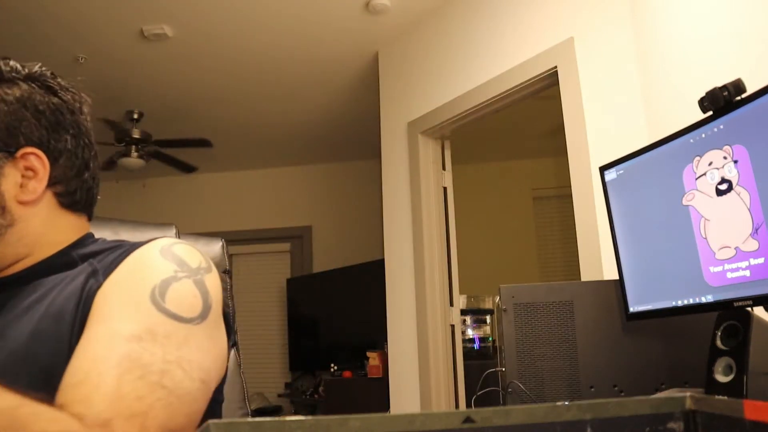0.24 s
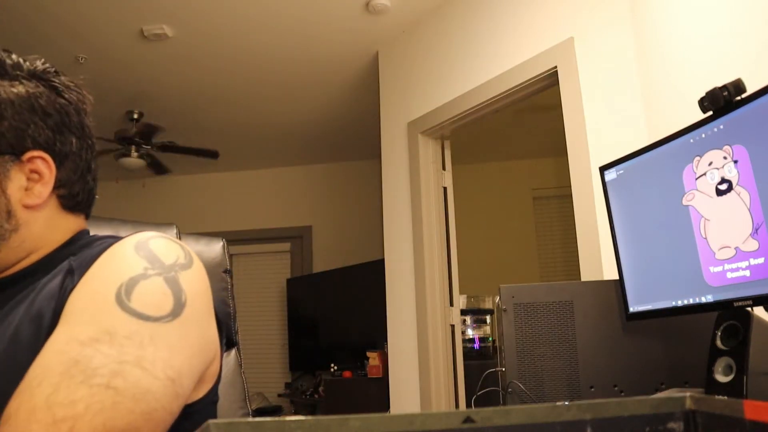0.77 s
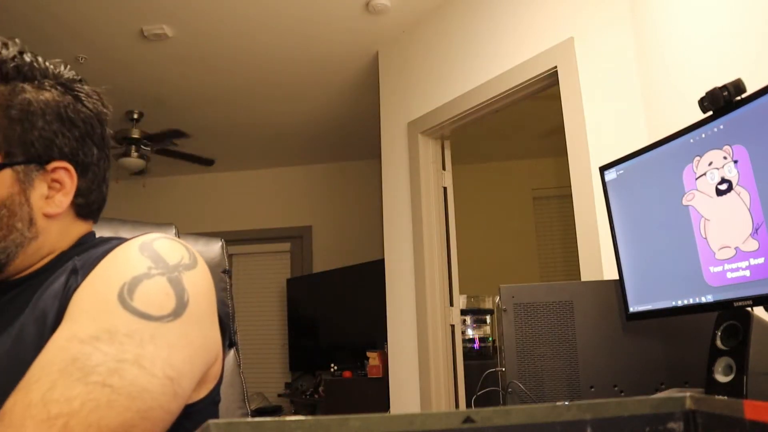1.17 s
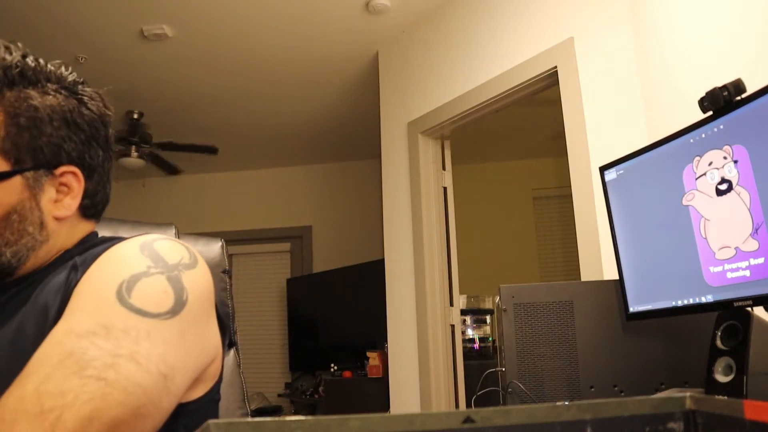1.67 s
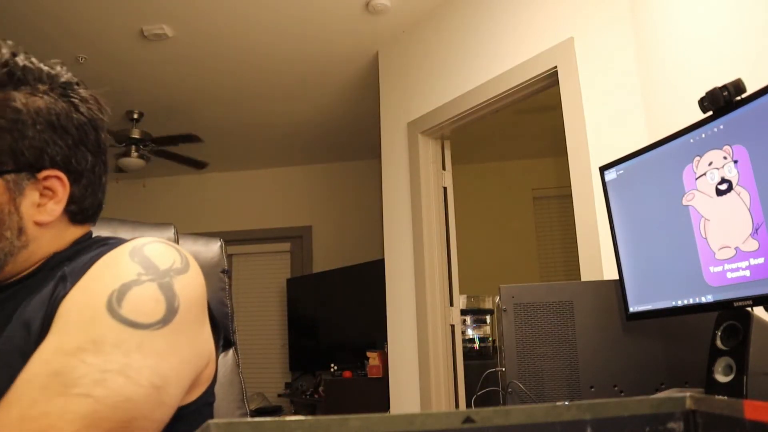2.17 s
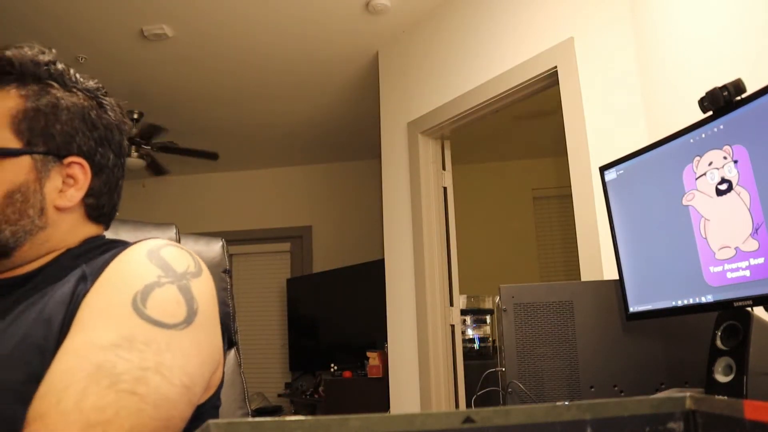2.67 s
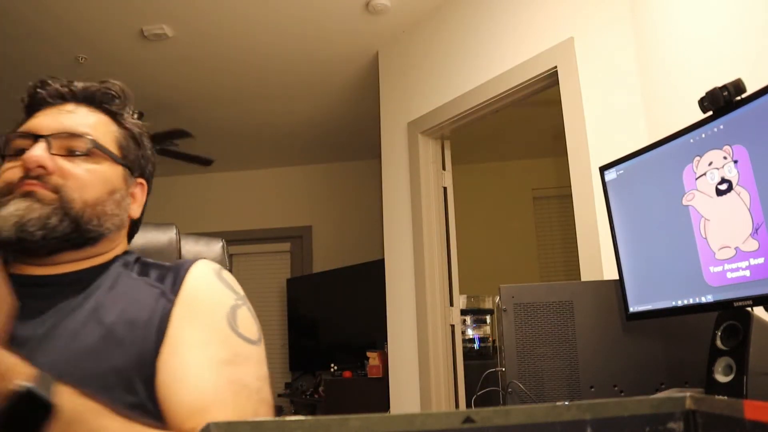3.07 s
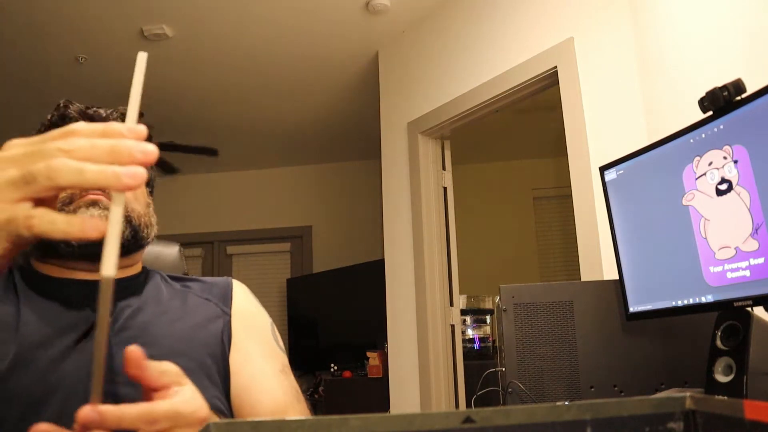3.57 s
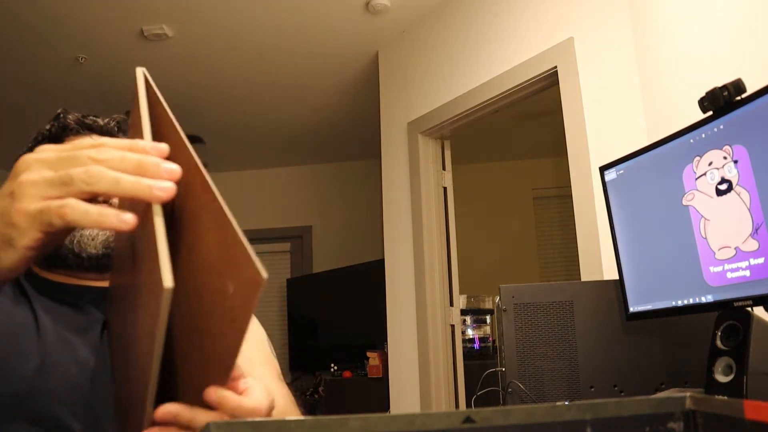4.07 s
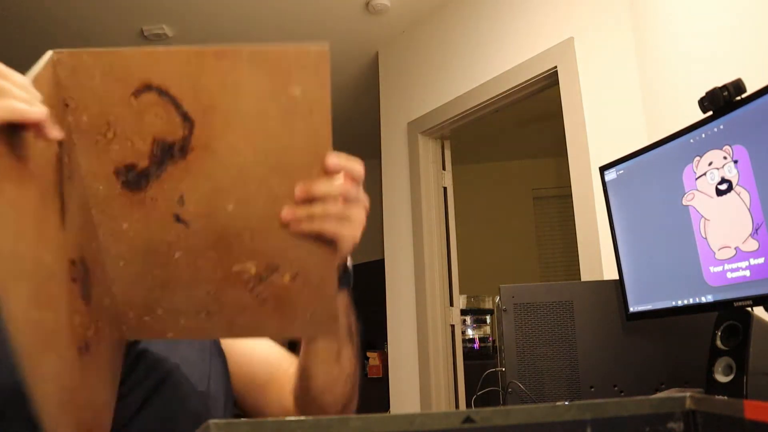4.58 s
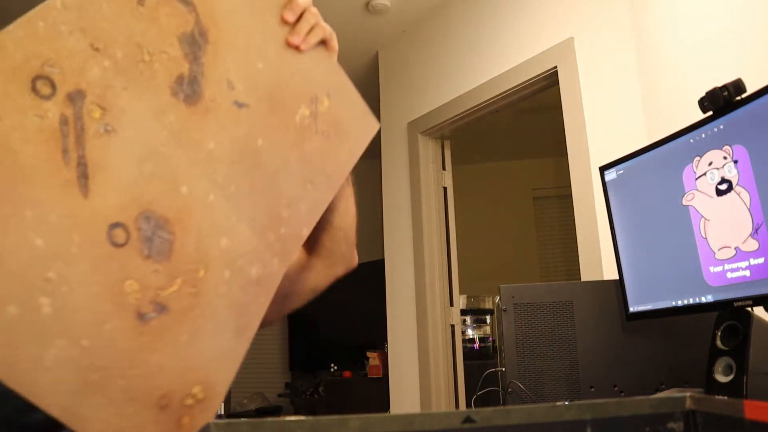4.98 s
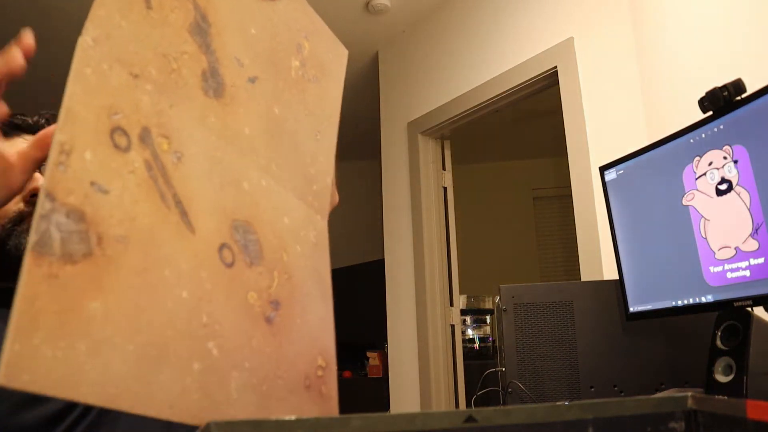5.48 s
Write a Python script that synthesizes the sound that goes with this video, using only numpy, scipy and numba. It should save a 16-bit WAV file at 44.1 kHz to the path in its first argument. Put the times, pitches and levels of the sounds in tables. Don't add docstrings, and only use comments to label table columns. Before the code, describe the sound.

Close to a bright microphone on a table in a small room, stiff card is dragged out with loud bright cracks and gritty hiss. Rustles and ticks follow, then another sharp snap and scrape near two seconds. Soft hand rubbing and unfolding come next, before a burst of heavy hollow knocks at the end. Low fan hum runs throughout.

```python
import sys
import numpy as np
from scipy import signal
from scipy.fft import rfft, irfft
from scipy.io import wavfile
from scipy.ndimage import uniform_filter1d
from numba import njit

SR = 44100
rng = np.random.default_rng(int(sys.argv[2]) if len(sys.argv) > 2 else 0)


def decibels_to_gain(level_db):
    exponent = np.asarray(level_db, float) / 20
    return 10 ** exponent


def waveform_to_disk(signal):
    frames = np.transpose(np.atleast_2d(signal))
    scaled = np.clip(frames, -1, 1) * 32767
    samples = np.round(scaled).astype(np.int16)
    wavfile.write(sys.argv[1], SR, samples)


N = 253134


def level(x, db):
    return x * decibels_to_gain(db) / np.sqrt(np.mean(x ** 2))


def colour(x, points):
    hz, db = np.transpose(points)
    f = np.maximum(np.arange(len(x) // 2 + 1) * SR / len(x), 1)
    gain = decibels_to_gain(np.interp(np.log(f), np.log(hz), db))
    return irfft(rfft(x) * gain, len(x))


@njit
def svf(x, hz, sharp):
    y = np.empty(len(x))
    band, low, damping = 0., 0., 1 / sharp
    for i in range(len(x)):
        g = np.tan(np.pi * hz[i] / SR)
        v = (band + g * (x[i] - low)) / (1 + g * (g + damping))
        band, low = 2 * v - band, low + 2 * g * v
        y[i] = damping * v
    return y


def walk(rate_hz):
    hold = int(SR / rate_hz)
    steps = np.repeat(rng.standard_normal(N // hold + 1), hold)
    smooth = uniform_filter1d(uniform_filter1d(steps, hold), hold)
    return 0.87 * smooth[:N]


def add(out, s, x):
    i = int(s * SR)
    out[i:i + len(x)] += x[:len(out) - i]


# [f/Hz, level/dB per Hz]
AIR_SPECTRUM = [(12, -37), (20, -9), (91, -9.5), (117, -23.5), (155, -6), (217, -4.5), (424, -15.5),
                (1070, -31.5), (1420, -29), (1720, -35.5), (2220, -35), (5000, -28.5), (5590, -29),
                (14500, -31), (16200, -37)]
# [f/Hz, width/Hz, level/dB]
HUM_MODES = [(122.3, 11.6, -44.5), (117, 7.4, -66), (219.4, 7.3, -48.5), (290.3, 9.2, -56.5),
             (1985, 95, -67), (4820, 160, -69)]
# [f/Hz, level/dB]
STEADY_TONES = [
    (27.5, -53.5),
    (14804, -76),
]


def air():
    t = np.arange(N) / SR
    breath = level(colour(rng.standard_normal(N), AIR_SPECTRUM), -44)
    out = breath * decibels_to_gain(0.3 * walk(11.0))
    for hz, width_hz, db in HUM_MODES:
        mode = svf(rng.standard_normal(N), np.full(N, 1. * hz), hz / width_hz)
        out = out + level(mode, db)
    for hz, db in STEADY_TONES:
        out = out + level(np.sin(2 * np.pi * hz * t + 1.1 * walk(3.15)), db)
    return out


def room(x):
    t60_s, tail_db, onset_s = 0.27, -7, 0.00043
    t = np.arange(20000) / SR
    tail = rng.standard_normal(len(t)) * 1000. ** (-t / t60_s) * np.clip(t / onset_s, 0, 1)
    tail = signal.lfilter([1], [1, -.2], tail)
    return signal.fftconvolve(x, tail * decibels_to_gain(tail_db) / np.sqrt(np.sum(tail ** 2)))[:N]


def whoop():
    start_s, length_s, from_hz, to_hz = 0.124, .05, 350, 620
    peak_db, overtone_db = -22, -6
    u = np.arange(int(length_s * SR)) / (length_s * SR)
    hz = from_hz + (to_hz - from_hz) * np.sin(np.pi * u / 2) ** 2
    phase = 2 * np.pi * np.cumsum(hz) / SR
    tone = np.sin(phase) + decibels_to_gain(overtone_db) * np.sin(1.4 * phase)
    out = np.zeros(N)
    add(out, start_s, decibels_to_gain(peak_db) * np.sin(np.pi * u) * tone)
    return out


# [f/Hz, level/dB, t60/s]
BOARD_MODES = [(46.5, -14, .2), (92, -1, 1), (109, -1.5, .14), (142, 5.5, 0.068), (193, 11.5, 0.039),
               (207.6, 11.5, 0.069), (320, 11.5, 0.075), (348, -9, 0.26), (432, 7.5, 0.053),
               (528, 5.5, 0.047), (710, -24.5, 0.02), (735, 0.5, 0.071), (937, 15, 0.055), (1125, 8, .03),
               (1435, 18, .04), (1920, 16, .03)]
# [t/s, peak level/dB, contact/ms, pitch factor, best-struck f/Hz]
KNOCK_EVENTS = [(0.079, -7, 0.64, 1.2, 1000), (0.125, -19, 0.35, 1.46, 301),
                (0.137, -16.5, 0.39, 1.46, 414), (0.149, -22, 0.89, 1.15, 537),
                (0.161, -36, 0.27, 1.37, 528), (1.974, -9.5, 0.35, 0.893, 790),
                (2.002, -15, 0.76, 1.025, 240), (5.034, -24.5, 0.83, 1.03, 336),
                (5.068, -22.5, 0.92, 0.986, 345), (5.163, -22.5, 0.98, 1.08, 353),
                (5.354, -27, 0.61, 1.13, 382), (5.375, -21.5, 0.95, 1.11, 336),
                (5.568, -2, 0.68, 1.06, 268), (5.578, 5, 0.76, 0.98, 263), (5.608, 4.5, 0.66, 0.94, 267),
                (5.62, 2, 0.46, 1.01, 345), (5.636, 0.5, 0.95, 1.02, 274), (5.66, -1.5, 0.83, 0.9, 270),
                (5.685, -7, 0.37, 0.986, 270), (2.929, -36, 8.1, 0.78, 70), (3.249, -27, 5.7, 0.815, 70),
                (5.699, -3.5, 11, 0.73, 69.6), (5.721, -18, 10, 0.53, 70), (5.735, -9, 6.5, 1, 70.4)]


def knocks():
    out, t = np.zeros(N), np.arange(12000) / SR
    hz, mode_db, t60_s = np.transpose(BOARD_MODES)[:, :, None]
    chance = rng.standard_normal((len(KNOCK_EVENTS), 3, len(BOARD_MODES), 1))
    for (s, db, contact_ms, pitch, best_hz), (spot, bend, side) in zip(KNOCK_EVENTS, chance):
        off_best_db = 3.0 * best_hz / 250 * np.log2(hz / best_hz) ** 2
        share = np.sign(side) * decibels_to_gain(mode_db + 1.5 * spot - off_best_db)
        bent_hz = hz * pitch * (1 + 0.064 * bend)
        ring = share * np.sin(2 * np.pi * bent_hz * t) * 1000. ** (-t / t60_s)
        push = np.sin(np.pi * np.clip(t[:1000] * 1000 / contact_ms, 0, 1))
        knock = signal.fftconvolve(ring.sum(axis=0), push)
        add(out, s, decibels_to_gain(db - 4.0) * knock / np.abs(knock).max())
    return out


# [f/Hz, level/dB per Hz]
CARD_SHEEN = [(1470, -36), (2500, -6.5), (3370, -6.5), (3670, -6), (4820, -3.5), (6810, -4), (7720, -3),
              (13500, -4.5), (15400, -4), (16200, -78)]
# [f/Hz, level/dB per Hz]
BOARD_BODY = [(150, -39), (250, -6.5), (528, -3.5), (959, -5), (1420, -3), (1900, -6), (2090, -3.5),
              (3200, -11.5), (4160, -10), (7040, -120)]
# [t/s, peak level/dB, centre f/Hz, body level/dB]
CREASE_CRACKS = [(0.0566, -2, 7900, -26.5), (0.079, 8, 9400, -23), (0.0808, -12, 7450, -32),
                 (0.0925, 8, 7800, -24), (0.102, 5, 7950, -23), (0.1094, 6, 7800, -18.5),
                 (0.1219, 1.5, 5590, -18.5), (0.1318, -4, 7700, -12.5), (0.1489, 0, 8470, -18),
                 (0.176, 3, 9000, -36), (0.2556, -6, 5200, -23), (0.8657, 6, 9600, -23),
                 (0.8693, -1, 8200, -35), (0.8757, -1, 6200, -45), (0.903, 2, 11700, -24),
                 (0.9105, -3.5, 6400, -30), (0.913, -0.5, 9650, -24), (0.9504, -9.5, 6330, -28),
                 (1.3173, -21, 12400, -15), (1.5838, -2, 9700, -53), (1.9623, -10.5, 4900, -28),
                 (1.9742, 9, 7300, -17), (2.0076, -1, 7560, -15.5), (2.0177, -1, 7700, -29),
                 (4.887, -14.5, 10400, -38), (5.3754, -33, 4300, -5.5), (5.569, -20, 3360, 1),
                 (5.6084, -25, 5980, 3), (5.6175, -21.5, 3140, 3), (5.636, -20, 4450, 0)]
# [t/s, peak level/dB, centre f/Hz]
FIBRE_TICKS = [(0.1854, -2, 8000), (0.2144, -15, 7530), (0.3126, -5, 7330), (0.3744, -7.5, 7100),
               (0.4234, -8.5, 6960), (0.4502, -14, 9300), (0.4692, -13, 9790), (0.502, -16, 7300),
               (0.5187, -8, 12400), (0.5324, -7.5, 9500), (0.6946, -12, 7940), (0.9224, -17, 7020),
               (1.068, -19, 7850), (1.0949, -22, 7750), (1.1738, -17.5, 8350), (1.215, -16, 8100),
               (1.2218, -10, 8200), (1.24, -15, 10600), (1.2514, -23, 7780), (1.277, -15.5, 10300),
               (1.2802, -12, 8200), (1.3514, -17, 9800), (1.5624, -18, 7760), (1.5914, -21, 9670),
               (1.7495, -15, 7600), (1.9971, 2, 7580), (2.2099, -33, 7250), (2.4372, -15, 7600),
               (2.9915, -22, 5330), (4.9474, -34, 5000)]


def cracks():
    out, t = np.zeros(N), np.arange(2048) / SR
    # (body level/dB, decay/ms, sharpness)
    snaps = [(*crack, 2.1, 1.75) for crack in CREASE_CRACKS]
    snaps += [(*tick, -28, 0.98, 2.4) for tick in FIBRE_TICKS]
    chance = rng.standard_normal((len(snaps), 2, 2048))
    for (s, db, hz, body_db, decay_ms, sharp), (fine, dull) in zip(snaps, chance):
        burst = (1 - np.exp(-t / 0.00021)) * np.exp(-t * 1000 / decay_ms)
        splinter = colour(fine, CARD_SHEEN)
        ring = level(svf(splinter, np.full(len(t), 1. * hz), sharp), 0)
        bright = (ring + 0.65 * level(splinter, 0) / sharp) * burst
        sheet = level(colour(dull, BOARD_BODY), 0)
        sheet = sheet * (1 - np.exp(-t / 0.00098)) * np.exp(-t / 0.0032)
        snap = bright / np.abs(bright).max()
        add(out, s, decibels_to_gain(db) * (snap + decibels_to_gain(body_db + 3.5) * sheet))
    return signal.sosfilt(signal.butter(2, 300, "high", fs=SR, output="sos"), out)


def grit(spread_db, flicker_db):
    size = decibels_to_gain(spread_db * rng.exponential(1, N) + flicker_db * walk(120))
    return level(size * rng.standard_normal(N), 0)


def strokes(*sets):
    board_per_grip, hiss_hz_per_grip = 0.87, 94
    t = np.arange(0, N + 32, 32) / SR
    rows = [(*row, *surface) for table, surface in sets for row in table]
    s, db, rise, fall, grip, board_db, hiss_hz, gap_hz, gap_db = np.transpose(rows)[:, :, None]
    away = np.where(t < s, (s - t) / rise, (t - s) / fall)
    power = decibels_to_gain(np.maximum(db - 20 * away, -120)) ** 2
    parts_db = (0, grip, board_db + board_per_grip * grip, gap_db)
    gains = [np.sqrt((power * decibels_to_gain(part_db) ** 2).sum(axis=0)) for part_db in parts_db]
    gap_power = power * decibels_to_gain(gap_db) ** 2
    hiss_centre = (power * (hiss_hz - hiss_hz_per_grip * grip)).sum(axis=0) / power.sum(axis=0)
    gap_centre = (gap_power * gap_hz).sum(axis=0) / gap_power.sum(axis=0)
    return [np.interp(np.arange(N) / SR, t, curve) for curve in gains + [hiss_centre, gap_centre]]


# [peak t/s, hiss level/dB, 20 dB rise/s, 20 dB fall/s, grip/dB]
WRAP_PULLS = [(0.0, -22, .05, 0.11, -10.5), (0.062, -24, 0.015, .04, -28), (0.086, -12, 0.017, 0.071, -8),
              (0.13, -10, 0.083, 0.21, -10), (0.18, -5.5, 0.018, 0.017, -3.5),
              (0.2, -15.5, 0.025, 0.27, -7), (0.365, -23, 0.22, 0.28, -6), (0.531, -26, 0.18, 0.099, -12.5),
              (0.58, -29, 0.028, 0.13, -3.5), (0.686, -23, 0.11, 0.28, -7), (0.818, -29, .3, 0.13, -10.5),
              (0.88, -18, 0.015, .06, -6), (0.94, -20, 0.09, 0.19, -8), (1.27, -29.5, 0.43, 0.12, -3),
              (1.31, -28.5, .03, 0.15, -42), (1.36, -35, 0.18, .4, -6.5), (1.435, -22.5, 0.066, 0.078, -19),
              (1.585, -25, 0.24, 0.23, -8), (1.764, -28.5, 0.085, 0.26, -6.5), (1.945, -35, 0.26, .05, -1),
              (1.966, -17, 0.012, .06, -17), (1.985, -11.5, 0.024, 0.074, -1),
              (2.01, -7.5, 0.032, 0.032, -8), (2.03, -15, .03, 0.24, -5)]
# [peak t/s, hiss level/dB, 20 dB rise/s, 20 dB fall/s, grip/dB]
HAND_RUBS = [(2.34, -25, 0.28, 0.23, -1.5), (2.44, -34.5, 0.22, 0.086, 4.5), (2.7, -46, 0.35, 0.22, 1.5),
             (2.865, -41, .02, .3, -1), (2.9, -39, .1, .15, -4), (3.008, -31, 0.051, 0.33, -3.5),
             (3.228, -35.5, 0.26, 0.12, -4), (3.438, -42, 0.14, 0.42, -25), (3.53, -44.5, .015, 0.25, 6),
             (3.584, -38.5, 0.2, 0.06, -0.2)]
# [peak t/s, hiss level/dB, 20 dB rise/s, 20 dB fall/s, grip/dB]
FOLD_OPENING = [(4.0, -42, 0.076, 0.028, -5), (4.09, -37, 0.12, 0.33, -6), (4.15, -29.5, 0.026, .2, 1),
                (4.175, -26, 0.065, 0.057, 0.5), (4.234, -27.5, 0.055, 0.23, 1),
                (4.36, -29, 0.13, 0.25, -0.5), (4.466, -37, 0.5, 0.044, 2.5), (4.65, -31, 0.14, 0.11, -6.5),
                (4.73, -41, .3, 0.18, -16)]
# [peak t/s, hiss level/dB, 20 dB rise/s, 20 dB fall/s, grip/dB]
LEAF_TOUCHES = [(4.895, -37, 0.015, 0.17, -8), (4.95, -32.5, 0.086, 0.027, -17),
                (5.11, -47, .015, 0.046, 0), (5.164, -36, 0.029, 0.11, -14), (5.38, -56, .05, 0.026, 10),
                (5.585, -36, 0.021, 0.075, -8), (5.624, -36, .03, 0.028, 2), (5.68, -39, .02, .06, 2)]
# [peak t/s, hiss level/dB, 20 dB rise/s, 20 dB fall/s, grip/dB]
PALM_SQUEEZE = [
    (3.16, -49, 0.48, 0.52, 12),
]


def slide():
    hiss_gain, sheen_gain, board_gain, gap_gain, hiss_hz, gap_hz = strokes(
        (WRAP_PULLS, (-10, 7500, 4900, -19.5)),
        (HAND_RUBS, (-11.5, 8002, 4900, -16)),
        (FOLD_OPENING, (-5, 7200, 4202, -14)),
        (LEAF_TOUCHES, (-10, 7800, 4947, -6)))
    *_, palm_gain, _, palm_hz = strokes((PALM_SQUEEZE, (2, 7600, 2070, 0)))

    flit = 1 + 0.11 * walk(60) + 0.05 * walk(14)
    hiss_hz = np.clip(hiss_hz * flit, 3000, 15000)
    hiss = svf(svf(colour(grit(1.8, 2.14), CARD_SHEEN), hiss_hz, 0.89), hiss_hz, 0.89)
    sheen_hz = np.full(N, 4100.)
    sheen = svf(svf(colour(grit(1.1, 4.2), CARD_SHEEN), sheen_hz, 1.0), sheen_hz, 1.0)
    board = colour(grit(0.77, 2.5), BOARD_BODY)
    gap = gap_gain * level(svf(grit(1.4, 1.5), gap_hz, 10.0), 0)
    palm = palm_gain * level(svf(grit(1.1, 1.8), palm_hz, 16.0), 0)

    friction = hiss_gain * level(hiss, -2.0) + sheen_gain * level(sheen, -4.6)
    return friction + board_gain * level(board, -0.25) + gap + palm


def scene():
    background = air()
    thuds = knocks() + whoop()
    snaps = cracks()
    rubs = slide()
    reflections = room(snaps + 0.28 * rubs + 0.8 * thuds)
    return (snaps + rubs + thuds + reflections + background)[None]


def band_limit(x):
    return signal.sosfilt(signal.butter(12, 16380, fs=SR, output="sos"), x)


def record(dry):
    mix = np.clip(dry, -1, 1)
    return band_limit(mix)


dry = scene()
out = record(dry)
waveform_to_disk(out)
```